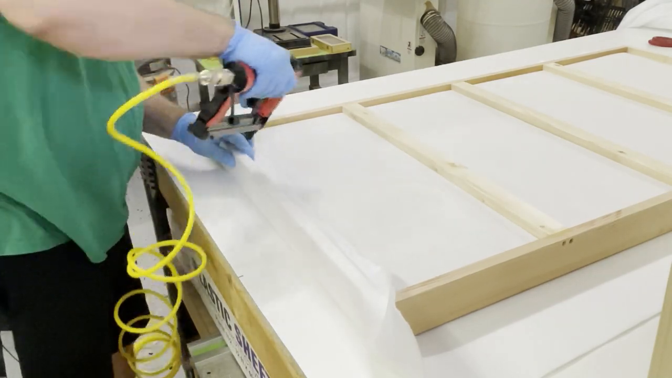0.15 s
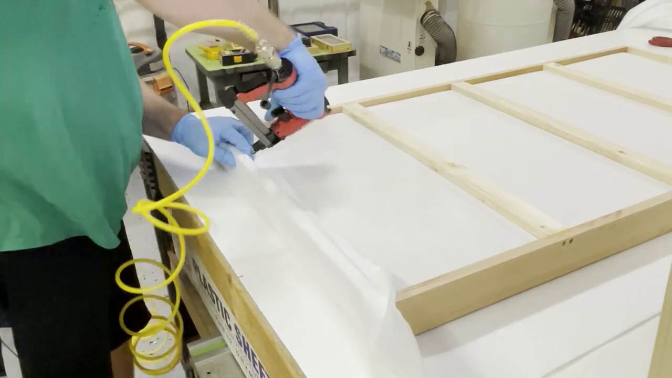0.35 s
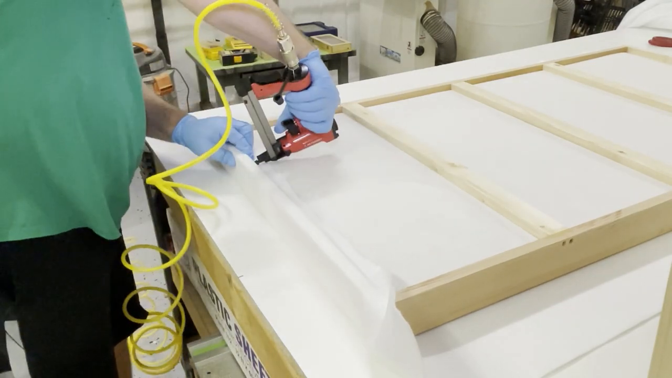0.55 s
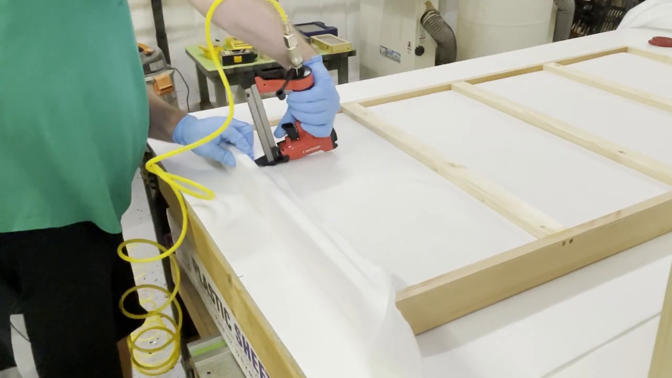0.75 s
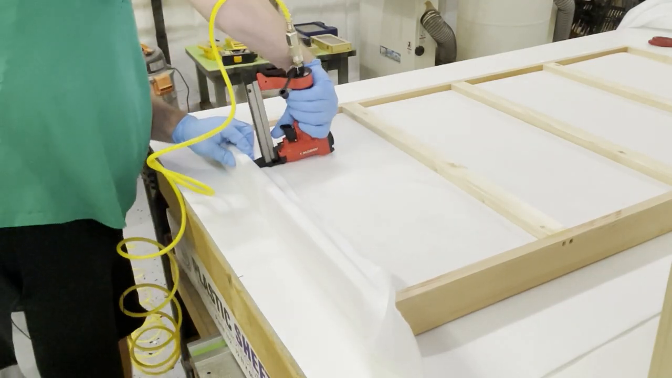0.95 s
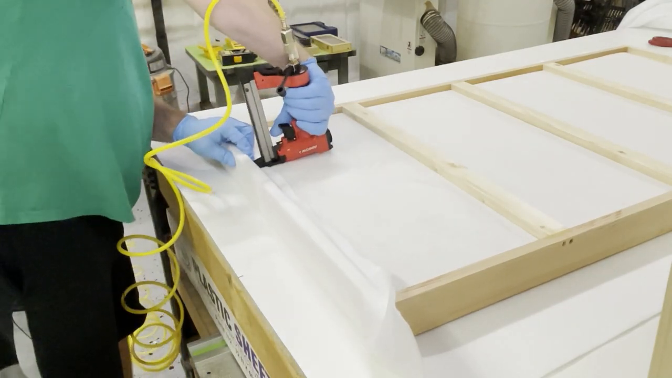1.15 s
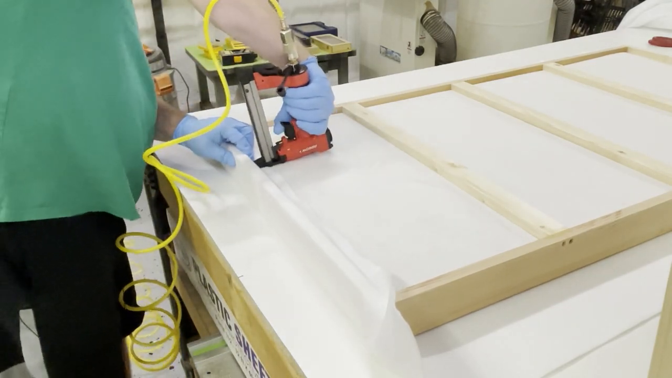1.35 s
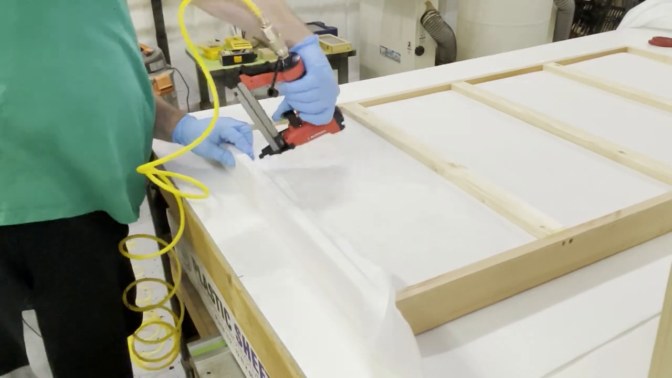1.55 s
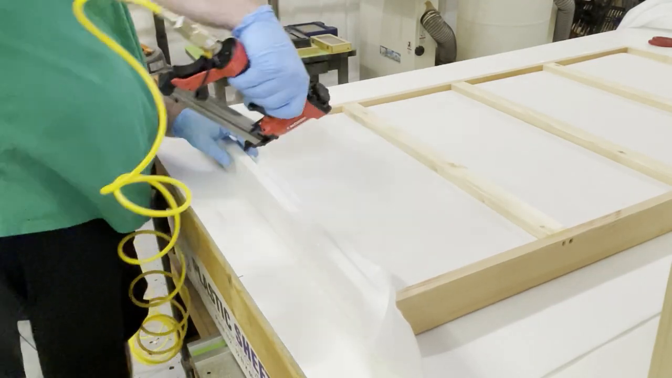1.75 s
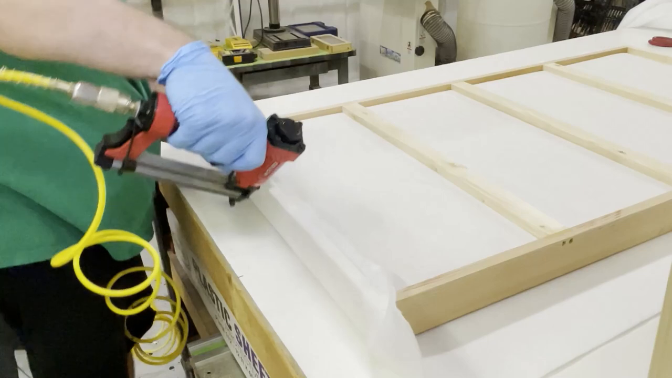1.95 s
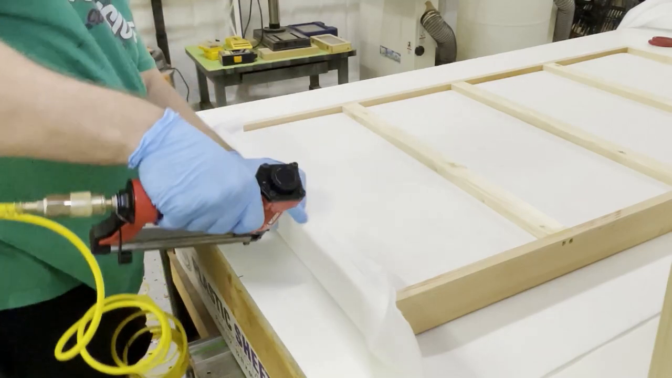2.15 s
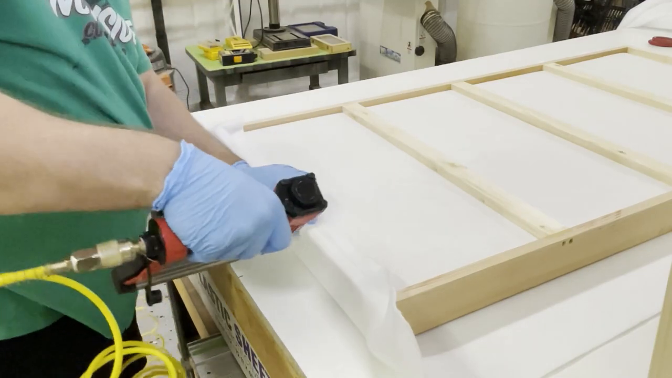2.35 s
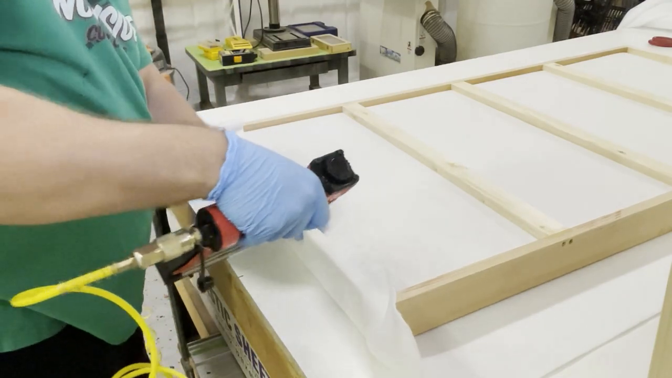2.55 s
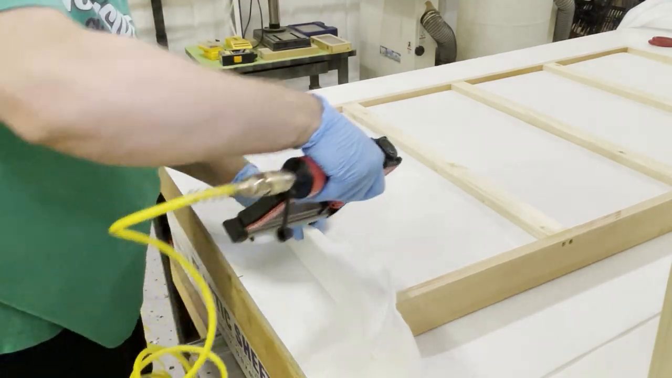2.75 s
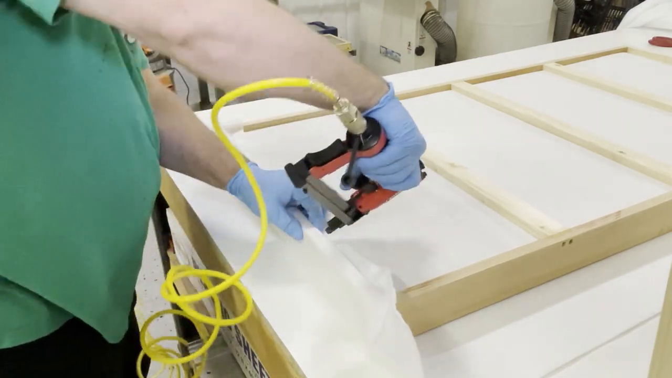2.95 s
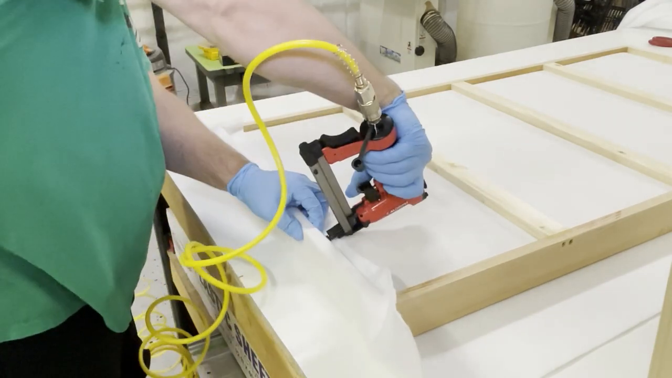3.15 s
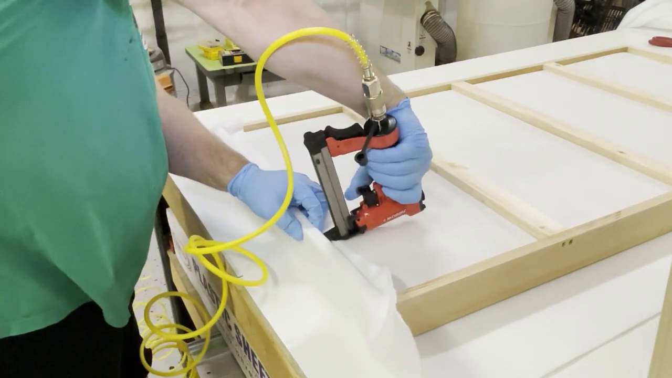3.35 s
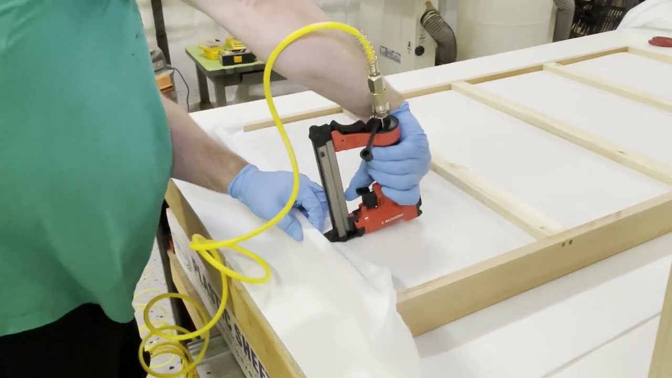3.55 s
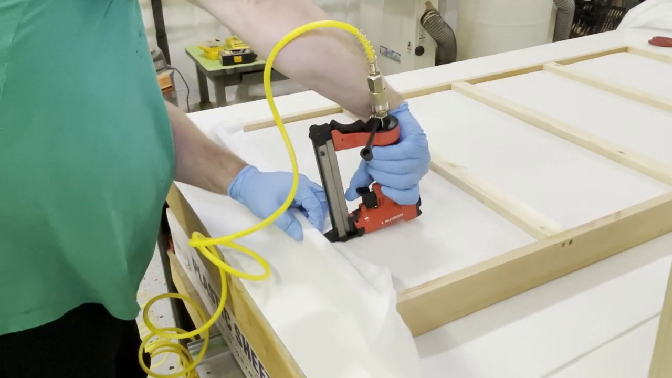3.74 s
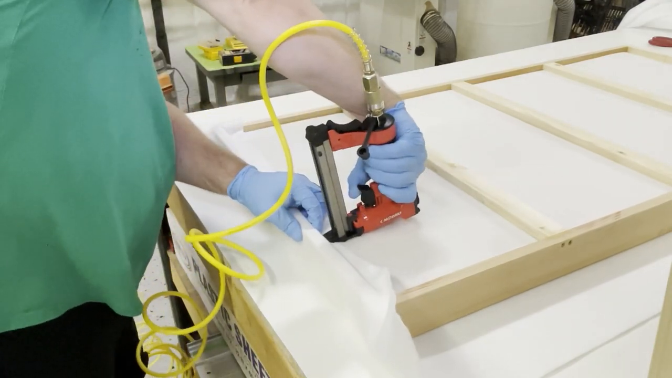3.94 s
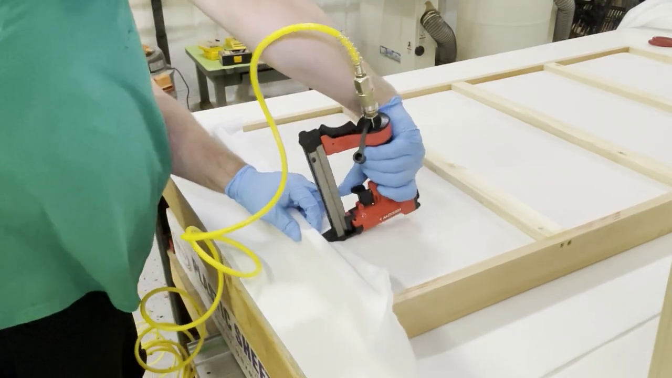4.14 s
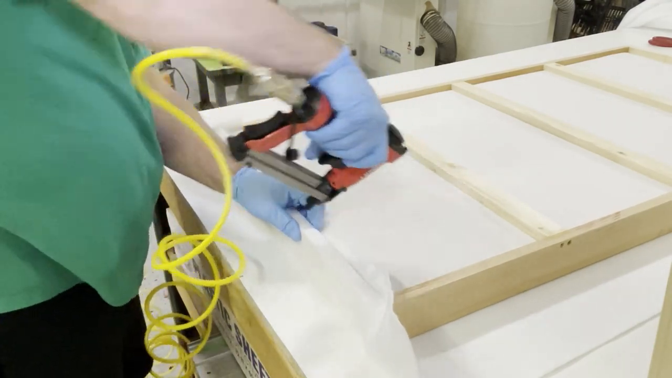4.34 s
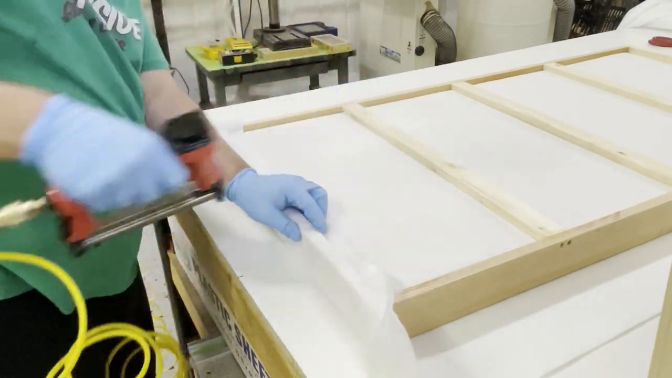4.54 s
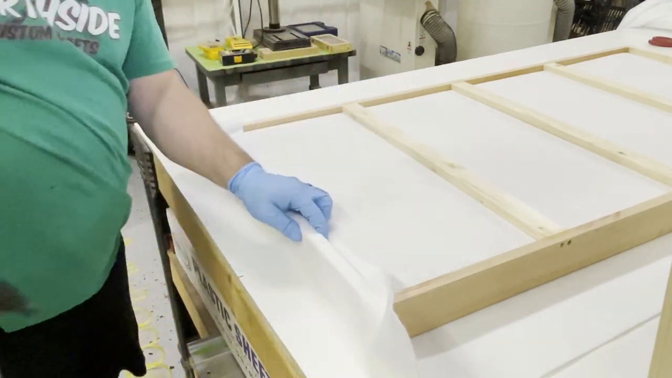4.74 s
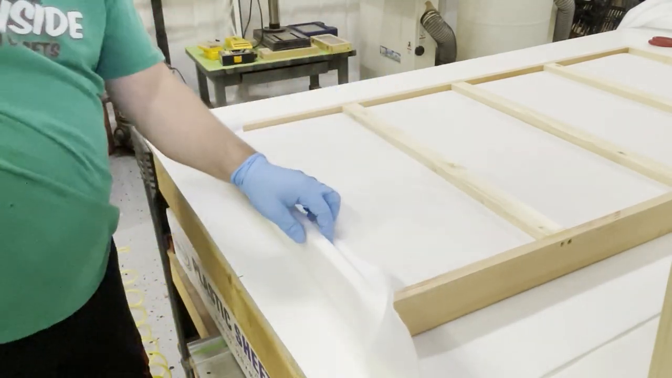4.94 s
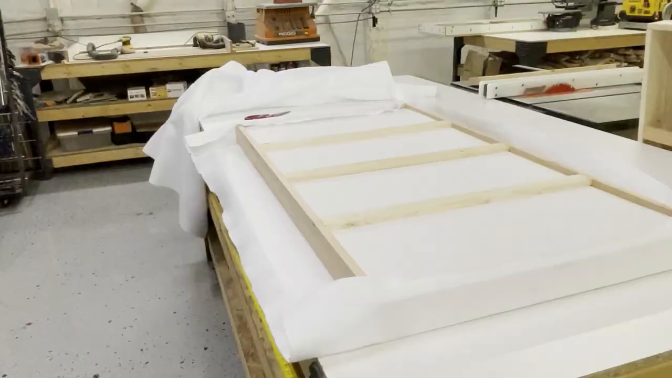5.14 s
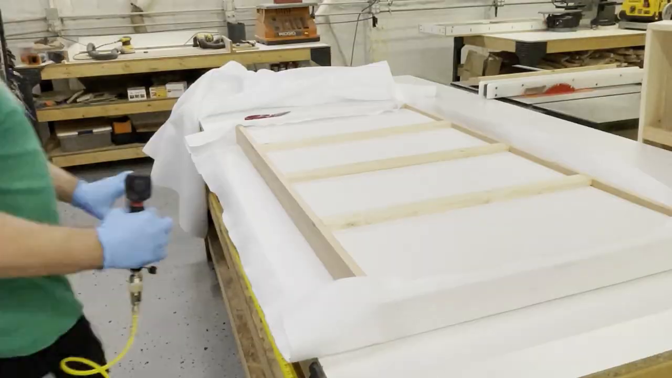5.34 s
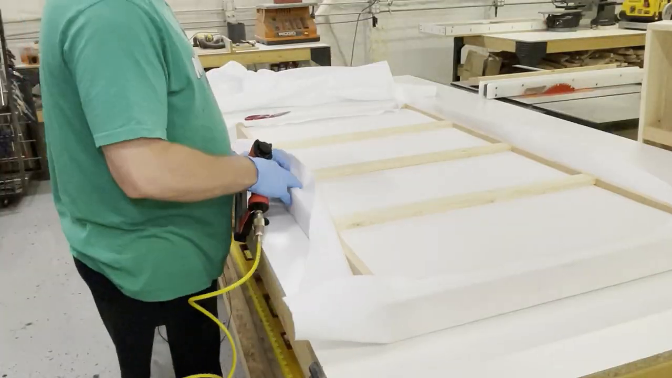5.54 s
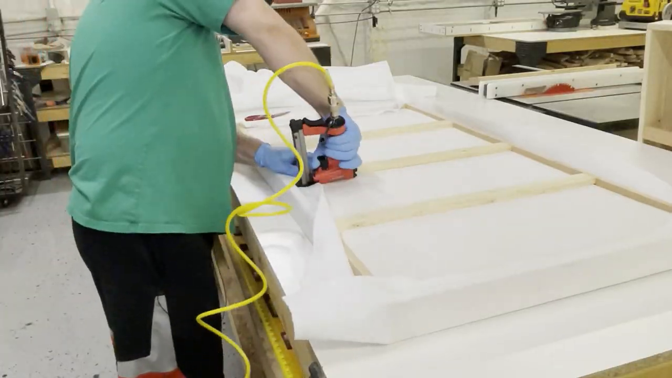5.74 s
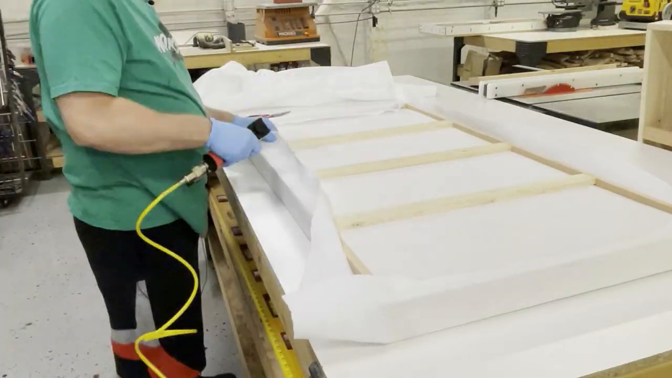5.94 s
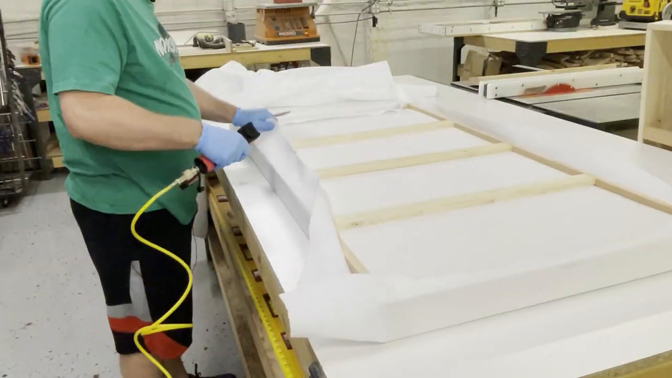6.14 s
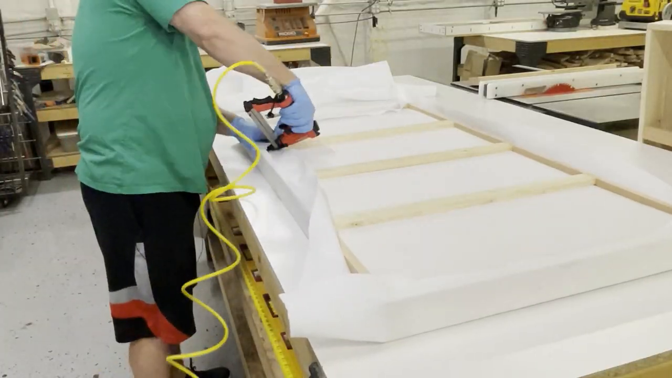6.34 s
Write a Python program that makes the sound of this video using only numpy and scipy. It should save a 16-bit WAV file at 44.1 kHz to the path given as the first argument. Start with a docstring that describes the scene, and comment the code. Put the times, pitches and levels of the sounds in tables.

```python
"""A large, echoing workshop, where a pneumatic stapler tacks fabric to a wooden frame.
Each shot sums decaying frame modes and shaped noise: an overloading crack, an exhaust puff and a piston knock.
Filtered noise gives the leaking air, sliding cloth, light bumps and steady rumble.
Near the end the scene runs in fast motion: shots are squeezed in time to dry double clicks,
the rumble becomes a fluttering hiss with ticks, and machine hum turns into faint gliding whistles."""
import sys
import numpy as np
from scipy import signal
from scipy.fft import rfft, irfft, next_fast_len
from scipy.io import wavfile

SR = 44100
rng = np.random.default_rng(int(sys.argv[2]) if len(sys.argv) > 2 else 0)


def unload_wav(signal):
    """Save mono or channel-first audio to the path in sys.argv[1] as 16-bit WAV at rate SR, clipped to [-1, 1]."""
    wavfile.write(
        sys.argv[1],
        SR,
        np.round(np.clip(np.atleast_2d(signal).T, -1, 1) * 32767).astype(np.int16),
    )


N = 281799
TIME = np.arange(N) / SR
SHOT_TIME = np.arange(2 * SR) / SR   # time axis of one short event
FAST_FROM_S = 5.16                   # start of the fast motion


def from_db(db):
    """Level to amplitude: 20 dB is a factor of ten."""
    return 10 ** (np.asarray(db) / 20)


def rms_one(x):
    """Normalization to unit root-mean-square amplitude."""
    return x / np.sqrt(np.mean(x ** 2) + 1e-20)


def at_hz(points, hz):
    """Spectral interpolation: values are joined by straight lines on a log-frequency axis."""
    f, value = np.transpose(points)
    return np.interp(np.log(np.maximum(hz, 1)), np.log(f), value)


def noise(spectrum, size=N):
    """Spectral shaping: white noise is weighted by frequency, then scaled to rms 1."""
    padded = next_fast_len(size)
    hz = np.fft.rfftfreq(padded, 1 / SR)
    white = rfft(rng.standard_normal(padded))
    coloured = irfft(white * from_db(at_hz(spectrum, hz)), padded)
    return rms_one(coloured[:size])


def drift(rate_hz):
    """Random modulation: straight lines join normal random values drawn at a given rate."""
    knots = np.arange(0, N / SR + 1, 1 / rate_hz)
    return np.interp(TIME, knots, rng.standard_normal(len(knots)))


def burst(t, rise_s, hold_s, t60_s):
    """Exponential decay: an envelope opens at t = 0, holds until hold_s, then falls 60 dB per t60_s."""
    return np.clip(t / rise_s, 0, 1) * from_db(-60 * np.clip((t - hold_s) / t60_s, 0, 4))


def swell(middle_s, half_s):
    """Gaussian envelope: a smooth rise and fall of height 1."""
    return np.exp(-((TIME - middle_s) / half_s) ** 2)


def add(out, start_s, sound):
    """Superposition: a sound is summed into the mix at a given time."""
    at = round(start_s * SR)
    out[at:at + len(sound)] += sound[:N - at]


def dying(sound, t, build_s=0.004):
    """Diffuse reverberation: sound builds up from t = 0 and each band decays at its own rate."""
    # the workshop's echo: hz, level_db, t60_s
    hall = np.array([(60, 3, .9), (160, 0.5, 0.92), (450, -1, 1.35), (1000, 1, 1.35), (2000, 1.5, 1.42),
                     (3620, 1, 1.05), (7500, -3, 1.5), (15000, 2, 0.77)])
    hz = np.fft.rfftfreq(len(t), 1 / SR)
    spectrum, out = rfft(sound), 0
    for share, (_, level_db, t60_s) in zip(np.eye(len(hall)), hall):
        band = irfft(spectrum * at_hz(np.c_[hall[:, 0], share], hz))
        out = out + from_db(level_db) * band * burst(t, build_s, 0.02, t60_s)
    return out


def workshop(x):
    """Room convolution: a sound is convolved with decaying noise of unit energy."""
    echo = dying(rng.standard_normal(len(SHOT_TIME)), SHOT_TIME)
    return signal.fftconvolve(x, echo / np.sqrt(np.sum(echo ** 2)))[:len(x)]


def shop_rumble():
    """Stationary broadband noise: the shop rumbles steadily, strongest in the bass."""
    # rumble spectrum: hz, relative_db
    rumble_colour = [(25, -9.5), (55, -0.5), (100, -5), (200, -10), (500, -14), (1400, -23.5), (2200, -30),
                     (3700, -29), (5600, -28.5), (8000, -40), (16000, -45)]
    return from_db(-63) * noise(rumble_colour)


def cloth_slide():
    """Stick-slip friction: under each hand stroke the fabric catches and slips unevenly on the wood."""
    # friction spectrum: hz, relative_db
    cloth_colour = [(90, -22.5), (200, -9.5), (380, -5), (520, 2.5), (700, -4), (950, -2), (1200, -8.5),
                    (1430, 2.5), (1700, -6.5), (2000, -17.5), (3000, -22.5), (6000, -41.5)]
    # strokes of the hand over the cloth: start_s, length_s, level_db
    strokes = [(-.1, 0.4, -56), (0.5, 0.39, -60.5), (2.156, 0.1, -52.5), (2.278, 0.47, -58),
               (2.945, 0.3, -66.5), (4.61, .56, -62)]
    rest_db, attack_s, t60_s = -76, 0.068, 0.49
    power = from_db(rest_db) ** 2
    for start_s, length_s, level_db in strokes:
        stroke = from_db(level_db) * burst(TIME - start_s, attack_s, length_s, t60_s)
        power = power + stroke ** 2
    grain_db = -1.0 * drift(90)
    return np.sqrt(power) * rms_one(noise(cloth_colour) * from_db(grain_db))


def bumps():
    """Damped impact: each light contact is a short noise, a click if its centre is high, a thud if low."""
    # tool, hose and hand bumping the frame: start_s, level_db, centre_hz, t60_s
    contacts = [(.4868, -48, 1204, .06), (.492, -48.5, 423.3, .1), (.712, -49, 261, .1),
                (1.222, -59.5, 1200, .04), (2.215, -55, 900, 0.055), (2.942, -48.5, 1102, 0.055),
                (3.151, -49.5, 1092, .07), (3.264, -46, 300, 0.089), (3.431, -51.5, 700, .08),
                (3.452, -45.5, 169.5, 0.14), (4.641, -49.5, 1500, 0.27), (4.656, -45, 300, 0.1)]
    out = np.zeros(N)
    for start_s, level_db, hz, t60_s in contacts:
        colour = [(hz / 8, -14), (hz / 2, -2), (hz, 0), (hz * 2, -9), (hz * 6, -30), (hz * 12, -55)]
        contact = noise(colour, len(SHOT_TIME)) * burst(SHOT_TIME, .001, 0.0012, t60_s)
        add(out, start_s, from_db(level_db) * contact)
    return out + from_db(-4.0) * workshop(out)


def leak_controls():
    """Jet flow and directivity: the seal sets the flow (dB), swings of the tool its gain (dB) and tilt (0-1)."""
    # the tool is lifted and swung over, turning its jet: middle_s, half_length_s, tilt (0-1), change_db
    swings = [(0, .22, 0.4, 10.5), (0.386, .16, .6, 1), (2.372, .22, .3, 5), (2.502, 0.6, .65, 0),
              (3.102, .25, .1, 0.5), (4.62, .24, .8, -2), (5.097, .15, .3, -7)]
    # the seal always weeps; the first shot unseats it and it hisses until it snaps shut
    weep_db, hiss_db = -72.0, -57.0
    from_s, open_s, shut_s, shut_t60_s = 1.5, 0.65, 4.68, .17
    hiss = burst(TIME - from_s, open_s, shut_s - from_s, shut_t60_s)
    flow_db = 20 * np.log10(np.hypot(from_db(weep_db), from_db(hiss_db) * hiss))
    gain_db = 2 * swell(shut_s, .025)   # the jet flares just as the seal closes
    tilt = 0
    for middle_s, half_s, lean, change_db in swings:
        gain_db = gain_db + change_db * swell(middle_s, half_s)
        tilt = tilt + lean * swell(middle_s, half_s)
    return flow_db, gain_db, np.clip(tilt, 0, 1)


def air_leak():
    """Turbulent jet noise with comb filtering: colour turns with the tool, and reflections shift in delay."""
    # jet spectra, tool upright and tilted: hz, relative_db
    upright_colour = [(1350, -62), (2300, -32), (2710, -17.5), (2930, -16), (3210, -5.5), (3450, -1),
                      (3770, -3.5), (4740, -5), (5530, -14.5), (6450, -5), (7640, -6), (8290, -9),
                      (9440, 0.5), (10200, -6.5), (11700, -13), (14900, -6.5), (16000, -15)]
    tilted_colour = [(1500, -30.5), (2600, -17), (3700, -7.5), (4400, -11.5), (5700, -3), (7300, -3.5),
                     (8400, -5), (10200, 2.5), (11800, -3), (13500, -6), (15000, -12.5), (16000, -17)]
    # reflections off board and hand, before tilt lengthens them: delay_s
    echo_delays = (0.00067, .00038)
    echo_share, lag_per_tilt, wobble = 0.23, 0.67, .11
    patchy_db, dull_per_hz = 0.5, .00005
    flow_db, gain_db, tilt = leak_controls()
    jet = np.sqrt(1 - tilt) * noise(upright_colour) + np.sqrt(tilt) * noise(tilted_colour)
    for delay_s in echo_delays:
        lag_s = delay_s * (1 + lag_per_tilt * tilt + wobble * np.sqrt(tilt) * drift(6))
        jet = jet + echo_share * np.sqrt(tilt) * np.interp(TIME - lag_s, TIME, jet)
    # overlapping bands change level separately
    padded, centres_hz = next_fast_len(N), np.linspace(3000, 16000, 24)
    spectrum, hz, out = rfft(jet, padded), np.fft.rfftfreq(padded, 1 / SR), 0
    for centre_hz, share in zip(centres_hz, np.eye(len(centres_hz))):
        band = irfft(spectrum * np.interp(hz, centres_hz, share), padded)[:N]
        bright_db = dull_per_hz * (centre_hz - 7000) * (flow_db + 59)   # a weak jet is duller
        out = out + band * from_db(bright_db + patchy_db * drift(9))
    return from_db(flow_db + gain_db) * rms_one(out)


def whistles():
    """Frequency modulation: machine hum in fast motion swells as sines that glide and waver."""
    # middle_s, half_length_s, pitch_hz, glide_hz_per_s, level_db
    glides = [(5.201, .055, 3530, 200.5, -69), (5.241, 0.2, 814, -110, -75.5),
              (5.422, .08, 1930, -260, -70), (6.103, .14, 1780, -19, -77),
              (6.203, 0.047, 824, 1299.5, -73.5), (6.3, 0.17, 3330, 800, -78.5),
              (6.33, .06, 1823, 448, -63), (6.329, .08, 912, 346, -74.5)]
    waver_hz, flicker_db = 10, 3.0
    out = 0
    for middle_s, half_s, hz, glide, level_db in glides:
        pitch_hz = hz + glide * (TIME - middle_s) + waver_hz * drift(120)
        tone = np.sqrt(2) * np.sin(2 * np.pi * np.cumsum(pitch_hz) / SR)
        out = out + from_db(level_db + flicker_db * drift(36)) * swell(middle_s, half_s) * tone
    return out


def small_ticks():
    """Jittered point process: faint handling knocks come unevenly and die down as the work settles."""
    per_s, first_db, spread_db, settle_db_per_s, ring_db = 14, -46.5, 2, 9, -17
    chance = rng.random((40, 2))
    after_s = (np.arange(len(chance)) + chance[:, 0]) / per_s
    level_db = first_db - settle_db_per_s * after_s + spread_db * (2 * chance[:, 1] - 1)
    return [(s, db, ring_db) for s, db in zip(FAST_FROM_S + after_s, level_db) if s < TIME[-1]]


def fast_motion():
    """Time compression raises pitch: rumble becomes a fluttering hiss, bumps tick and machine hum whistles."""
    # spectra of the sped-up rumble, the ticks and the wood's ring: hz, relative_db
    rumble_colour = [(24, -33), (40, -2), (290, -8.5), (630, -3), (733, 1.5), (1020, -1), (1590, 1),
                     (3220, -2), (3740, -8.5), (14800, -9), (16000, -9)]
    tick_colour = [(100, -16), (900, -23.5), (2000, -2), (3500, -1), (6000, -3.5), (9000, -3),
                   (16000, -8.5)]
    ring_colour = [(200, -32.5), (950, -26), (1400, -6.5), (1800, -1.5), (2080, -12), (2300, 2), (2550, -7),
                   (3200, -9.5), (5000, -13.5), (16000, -38)]
    # louder handling knocks: start_s, level_db (before snap and ring gains), ring_db (woody share)
    ticks = [(5.178, -40.5, -18), (5.236, -43, -22), (5.276, -45, -25), (5.3636, -45.5, -29),
             (5.465, -44, -8), (5.517, -50, -3.5), (5.554, -40, 0), (5.6706, -39.5, -6), (6.3496, -47, -16)]
    flutter_db = 2.0 * drift(150)
    out = from_db(-68.5) * noise(rumble_colour) * from_db(flutter_db)
    crackle_db = 12.0 * np.minimum(drift(150), 2)
    out += from_db(-91.0) * noise(tick_colour) * from_db(crackle_db)
    size = len(SHOT_TIME)
    for start_s, level_db, ring_db in ticks + small_ticks():
        snap = from_db(-12.5) * noise(tick_colour, size) * burst(SHOT_TIME, 0.0013, 0.002, 0.02)
        ring = from_db(ring_db - 5.5) * noise(ring_colour, size) * burst(SHOT_TIME, 0.0017, 0.0019, 0.058)
        add(out, start_s, from_db(level_db) * (snap + ring))
    return out + whistles()


def overload(x, top=1.0):
    """Soft saturation: the microphone flattens the loudest peaks."""
    return x / (1 + (x / top) ** 4) ** (1 / 4)


def frame_ring(t, spot):
    """Modal synthesis: a blow drives the modes for a few milliseconds, as strongly as its spot allows."""
    # modes of stapler and frame: pitch_hz, near_db (spot 0), far_db (spot 1), t60_s
    modes = [(101, -20.5, -27, 0.11), (263, -18.5, -14, 0.033), (473, -10.5, -20, 0.036),
             (627, -7, -17, 0.023), (800, -15.5, -8, .025), (908, -6, -13.5, 0.029),
             (1247, -8.5, -4, 0.012), (1425, -10.5, -8.5, 0.022), (1586, -6.5, -14, 0.016),
             (1775, -10.5, -11, 0.0091), (1993, -7.5, -22.5, 0.012), (2583, -25, -15, .02),
             (2970, -24.5, -12.5, 0.013), (3560, -21.5, -10, 0.013), (4380, -29.5, -19.5, 0.011),
             (6060, -23.5, -13.5, 0.0091)]
    rise_s, push_s = .0007, .006
    t, out = np.maximum(t, 0), 0
    for k, (hz, near_db, far_db, t60_s) in enumerate(modes):
        strength = (-1) ** k * from_db(near_db + spot * (far_db - near_db))   # signs alternate
        out = out + strength * np.sin(2 * np.pi * hz * t) * burst(t, rise_s, push_s, t60_s)
    return out


def shot(blow_db, spot, crack_db, rebound_db, exhaust_s, exhaust_db, home_s, knock_db, gust_db, room_db, lead_s):
    """Impact and gas discharge: valve hiss, blow, staple crack, exhaust puff, piston knock and their echo."""
    # source spectra: hz, relative_db
    valve_colour = [(100, -20), (1500, -4.5), (5500, 0), (10000, -4.5), (16000, -17)]
    crack_colour = [(40, -7.5), (150, 3.5), (500, 0), (1500, 2.5), (3500, -9), (7000, -12.5), (16000, -19)]
    puff_colour = [(35, -14.5), (110, 6), (300, 3), (600, -6.5), (1700, -1.5), (2400, -21), (4000, -18.5),
                   (5600, -11.5), (6600, -10), (7600, -5.5), (9000, -5), (11300, -9.5), (14900, -13),
                   (16000, -16)]
    knock_colour = [(60, -11.5), (300, 2), (1200, 5.5), (2000, -10.5), (3000, -8.5), (8000, -19),
                    (16000, -40.5)]
    gust_colour = [(3, -13), (10, -10), (20, -1.5), (35, -14.5), (110, -9), (250, -29), (1000, -61)]
    # what the bench radiates into the room, struck at spot 0 and at spot 1: hz, relative_db
    boom_near = [(35, -50.5), (60, -25), (76, -25.5), (256, -9), (330, -9), (593, -4.5), (732, -13.5),
                 (882, -2), (1780, -16), (2000, -7.5), (2250, -18), (2970, -9.5), (3340, -18),
                 (3580, -17.5), (16000, -43.5)]
    boom_far = [(35, -48.5), (60, -20.5), (176, -12.5), (256, -5), (371, -13), (480, 0.5), (666, -22),
                (785, -0.5), (1170, -8), (1380, 0), (1510, -12.5), (1700, -4.5), (2000, -14.5), (3500, -12),
                (16000, -41.5)]
    # exhaust thrown back by nearby surfaces and by the room: hz, relative_db
    near_colour = [(500, -21.5), (3000, -10.5), (7500, -1.5), (11000, -2), (16000, -6.5)]
    vent_colour = [(60, 5.5), (300, 8.5), (1500, 0), (2800, 2.5), (5000, -19.5), (8000, -6.5), (11000, -11),
                   (16000, -13)]
    t, size = SHOT_TIME - lead_s, len(SHOT_TIME)
    since_exhaust = t - exhaust_s
    # the valve opens just ahead of the blow
    valve = from_db(-30.0) * noise(valve_colour, size) * burst(t + .018, .014, .018, .02) ** 2
    # the tool recoils and its nose lands once more
    blow = from_db(blow_db) * frame_ring(t, spot) + from_db(rebound_db) * frame_ring(t - .015, spot)
    # the staple bites into the wood just after the driver starts
    crack = from_db(crack_db) * noise(crack_colour, size) * burst(t - .001, 0.00077, 0.0049, 0.014)
    # the trigger is let go: the cylinder vents and the piston flies back to its stop
    puff = from_db(exhaust_db) * noise(puff_colour, size) * burst(since_exhaust, .004, 0.009, 0.06)
    knock = from_db(knock_db) * noise(knock_colour, size) * burst(t - home_s, 0.00025, 0.00051, 0.021)
    # displaced air buffets the microphone, at the blow and again at the exhaust
    push = burst(t, 0.0023, 0.031, 0.28) + from_db(-13.5) * burst(since_exhaust, 0.0042, 0.0096, 0.05)
    gust = from_db(gust_db) * noise(gust_colour, size) * push
    # bench and jet radiate every way, so their echo is smooth; the frame's ring lightly colours it
    boom = np.sqrt(1 - spot) * noise(boom_near, size) + np.sqrt(spot) * noise(boom_far, size)
    echo = from_db(room_db) * dying(boom, t) + from_db(-20.5) * workshop(blow)
    echo += from_db(exhaust_db - 22.0) * dying(noise(vent_colour, size), since_exhaust)
    # nearby surfaces throw the puff straight back
    near_envelope = burst(since_exhaust - .01, .01, 0.019, 0.39)
    echo += from_db(exhaust_db - 22.5) * noise(near_colour, size) * near_envelope
    return valve + blow + crack + puff + knock + gust + echo


def stapler(lead_s):
    """Time scaling: shots at normal speed, then shots squeezed in time and so raised in pitch."""
    # start_s, blow_db, spot (0-1 along the frame), crack_db, rebound_db, exhaust_s (after the blow),
    # exhaust_db, home_s (piston, after the blow), knock_db, gust_db, room_db
    normal_shots = [(1.3055, 2.5, 0.01, -9, -14, 0.1222, -12.5, .1422, -13.5, -31, -23),
                    (3.961, -2, 0.99, -2.5, -24, 0.1358, -12, .1545, -10, -28, -26)]
    # same columns, with delays at normal speed and levels before squeezing
    fast_shots = [(5.8175, -28, 0.73, 4.5, -29, .137, -12.5, .152, -10.5, -36.5, -23.5),
                  (5.9528, -6, 0.9, -1.4, -35, 0.144, -12.5, .16, -11, -26, -28.5)]
    speed_up = 20
    out = np.zeros(N)
    for start_s, *settings in normal_shots:
        add(out, start_s - lead_s, shot(*settings, lead_s))
    for start_s, *settings in fast_shots:
        squeezed = signal.resample_poly(overload(shot(*settings, lead_s)), 1, speed_up)
        add(out, start_s - lead_s / speed_up, from_db(5.0) * squeezed)
    return out


def scene():
    """Superposition: the shots sound over the normal-speed background, then over the fast one."""
    lead_s = .02   # room for the valve ahead of each blow
    normal = shop_rumble() + cloth_slide() + bumps() + air_leak()
    background = np.where(TIME < FAST_FROM_S, normal, fast_motion())
    return (background + stapler(lead_s))[None]


def record(dry):
    """Saturation and low-pass filtering: peaks overload and the top is cut."""
    cutoff_hz = 15900
    low_pass = signal.ellip(10, .1, 70, cutoff_hz, fs=SR, output="sos")
    return signal.sosfilt(low_pass, overload(dry))


dry = scene()
out = record(dry)
unload_wav(out)
```